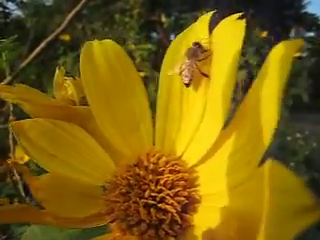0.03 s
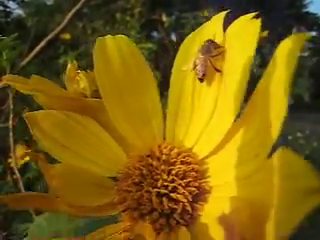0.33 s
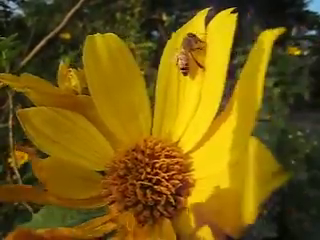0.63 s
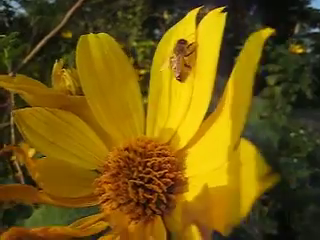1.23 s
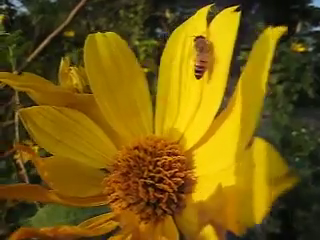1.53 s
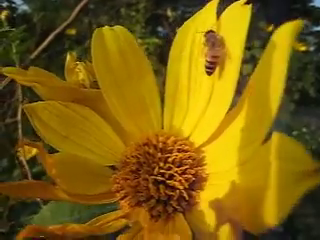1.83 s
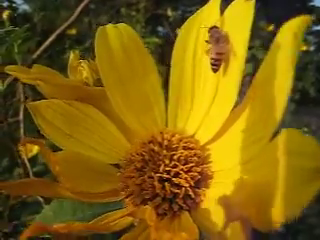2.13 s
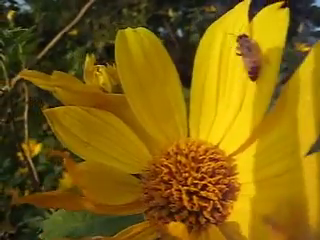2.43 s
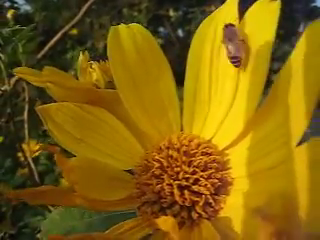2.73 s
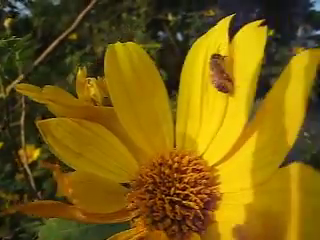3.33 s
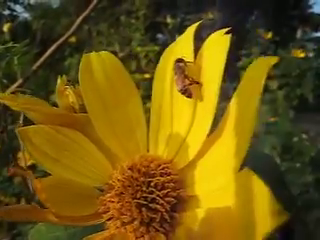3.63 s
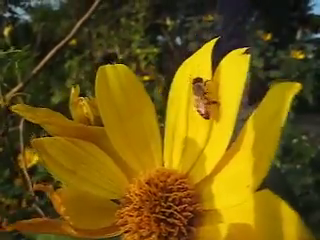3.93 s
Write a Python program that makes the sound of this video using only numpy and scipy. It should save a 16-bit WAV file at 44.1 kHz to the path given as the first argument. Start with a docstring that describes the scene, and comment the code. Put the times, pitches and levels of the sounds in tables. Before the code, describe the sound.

Quick, thin bird chirps come and go above a distant rumble and soft hiss.

```python
"""A garden, where small birds call in short bursts: quick falling chips, often followed by a
warbled cheep. Each call is a nearly pure tone modulated in frequency, which the ground, trees and
walls reflect. Under the birds lie a distant rumble and hiss, two deep drones, a brief far tone
and one dry tick, all filtered noise. Light air bumps the microphone now and then."""
import sys
import numpy as np
from scipy import signal
from scipy.fft import rfft, irfft
from scipy.io import wavfile
from scipy.ndimage import uniform_filter1d

SR = 44100
rng = np.random.default_rng(int(sys.argv[2]) if len(sys.argv) > 2 else 0)


def store_pcm(level_fs):
    """Save levels as 16-bit WAV."""
    pcm = np.round(np.clip(level_fs, -1, 1) * 32767).astype(np.int16)
    wavfile.write(sys.argv[1], SR, np.atleast_2d(pcm).T)


N = 176400
TIME = np.arange(N) / SR


def amp(db):
    """Amplitude grows tenfold with every 20 decibels."""
    return 10 ** (np.asarray(db) / 20)


def unit(x):
    """Normalisation: the signal is scaled to an rms of 1."""
    return x / np.sqrt(np.mean(x ** 2) + 1e-20)


def add(mix, start_s, sound):
    """Superposition: a sound adds to the mix from start_s on."""
    part = mix[max(round(start_s * SR), 0):][:len(sound)]
    part += sound[:len(part)]


def band_noise(centre_hz, width_hz):
    """Gaussian filtering leaves one band of noise; centred on zero it is a random wander."""
    hz = np.fft.rfftfreq(N, 1 / SR)
    band = np.exp(-.5 * ((hz - centre_hz) / width_hz) ** 2)
    return unit(irfft(rfft(rng.standard_normal(N)) * band, N))


def rumble_and_hiss():
    """Spectral shaping of noise gives a distant wash whose bass and mids swell separately."""
    # background spectrum: frequency_hz, relative_density_db
    spectrum = [(15, -19.5), (28, -12.5), (40, -0.5), (60, 4.5), (90, -8.5), (160, -10.5), (290, -14.5),
                (420, -21), (520, -20.5), (780, -23.5), (1450, -32.5), (2300, -37.5), (3500, -41),
                (5400, -45)]
    # swell of the bass: time_s, gain_db
    bass_swell = [(0, -.5), (.6, -.5), (.9, -6), (1.15, -3.5), (1.5, -1.5), (2.2, -1), (2.9, -1.5),
                  (3.3, 1), (3.7, -2), (4, -1)]
    # swell of the mids: time_s, gain_db
    mid_swell = [(0, 7.5), (.08, 1.5), (.75, -1.5), (1.4, 0.4), (2.2, 0.5), (3.05, 1), (3.3, 1.5),
                 (3.88, 1.5), (3.95, 6), (4, 9.5)]
    bass_top_hz, mid_hz, mid_width_octaves = 390, 1100, 0.84
    size, hop = 2048, 512
    t = np.arange(N // hop + 5) * hop / SR
    hz = np.fft.rfftfreq(size, 1 / SR) + 1
    real, imag, patches = rng.standard_normal((3, len(t), len(hz)))
    patches = uniform_filter1d(patches, size=8, axis=0)  # smooth in time, then in frequency
    patches_db = 0.78 * unit(uniform_filter1d(patches, size=14, axis=1))
    frequency_hz, density_db = np.transpose(spectrum)
    field_db = np.interp(np.log(hz), np.log(frequency_hz), density_db) + patches_db
    bass_band = 1 / (1 + (hz / bass_top_hz) ** 4)
    mid_band = np.exp(-.5 * (np.log2(hz / mid_hz) / mid_width_octaves) ** 2)
    field_db += np.outer(np.interp(t, *np.transpose(bass_swell)), bass_band)
    field_db += np.outer(np.interp(t, *np.transpose(mid_swell)), mid_band)
    frames = (real + 1j * imag) * amp(field_db)
    wash = signal.istft(frames.T, nperseg=size, noverlap=size - hop)[1][:N]
    return amp(-31.5) * unit(wash)


def drones():
    """Beating within narrow noise bands makes deep, wavering drones, as of a far engine."""
    # deep drones: pitch_hz, width_hz, level_db
    bands = [(40.4, 2.9, -36.5), (122.2, 10, -43.5)]
    return sum(amp(level_db) * band_noise(pitch_hz, width_hz) for pitch_hz, width_hz, level_db in bands)


def far_tone():
    """Exponential decay: a faint, far-off tone dies away in the first moments."""
    level_db, t60_s = -40.5, 0.39
    return amp(level_db - 60 * TIME / t60_s) * band_noise(centre_hz=864, width_hz=9.1)


def tick():
    """A heavily damped noise transient is heard as one dry tick, as of a twig."""
    start_s, decay_s, level_db = 2.928, .0011, -37
    age = TIME - start_s
    envelope = (age > 0) * np.exp(-abs(age) / decay_s)
    return amp(level_db) * envelope * band_noise(centre_hz=3900, width_hz=840)


def air_bumps():
    """Turbulence: each eddy at the microphone is one short, low swing of pressure."""
    # eddies: centre_s, pitch_hz, peak_db
    eddies = [(0.265, 68, -13.5), (0.487, 59.4, -16.5), (0.524, 65, -17), (.541, 128, -18.5),
              (0.565, 120, -15.5), (0.61, 90, -15.5), (0.797, 65, -17), (2.163, 65, -19),
              (2.501, 66, -20.5), (2.612, 91.6, -14), (3.154, 64, -20)]
    width_cycles = 0.31
    pressure = np.zeros(N)
    for centre_s, pitch_hz, peak_db in eddies:
        cycles = (TIME - centre_s) * pitch_hz
        envelope = np.exp(-.5 * (cycles / width_cycles) ** 2)
        pressure -= amp(peak_db) * envelope * np.cos(2 * np.pi * cycles)
    return pressure


def garden_echoes(direct):
    """Reflection and scattering: near echoes and a thin tail from the trees join the direct sound."""
    # reflections from the ground and nearby leaves: delay_s, gain_db
    reflections = [(.0043, -14.5), (.0115, -14), (.047, -20)]
    arrivals_per_s, build_s, t60_s, tail_db = 2000, 0.034, 0.72, -7.5
    t = TIME[:SR]
    tail = rng.standard_normal(SR) * (rng.random(SR) < arrivals_per_s / SR)
    tail *= (1 - np.exp(-t / build_s)) * amp(-60 * t / t60_s)
    response = amp(tail_db) * tail / np.linalg.norm(tail)
    for delay_s, gain_db in reflections:
        add(response, delay_s, amp([gain_db]))
    return direct + signal.fftconvolve(direct, response)[:N]


def whistle(pitch_hz, level_db, wander):
    """Random frequency and amplitude modulation make a soft-edged sine tone slightly unsteady."""
    edge_s, jitter_fraction, flutter_db = 0.0041, 0.024, 1
    t = np.arange(len(pitch_hz)) / SR
    drift, flutter = wander[:, :len(t)]
    ramp = np.clip(np.minimum(t, t[-1] - t) / edge_s, 0, 1)
    envelope = amp(level_db - flutter_db * flutter) * np.sin(np.pi / 2 * ramp)
    phase = 2 * np.pi * np.cumsum(pitch_hz * (1 + jitter_fraction * drift)) / SR
    return np.sqrt(2) * envelope * np.sin(phase)


def birds():
    """Frequency modulation shapes the calls: chips glide down, cheeps arch and warble."""
    # falling chips: start_s, length_s, start_hz, end_hz, level_db
    chips = [(0.171, 0.027, 2900, 2450, -52.5), (0.417, 0.017, 2980, 1940, -42),
             (.448, 0.016, 2440, 2020, -49.5), (0.589, 0.013, 3060, 2300, -49.5),
             (0.644, 0.021, 2580, 2410, -51), (0.668, 0.024, 2250, 1870, -45),
             (0.688, 0.0084, 1720, 1500, -45.5), (.697, 0.0075, 2630, 2550, -43.5),
             (0.702, 0.031, 2347, 2097, -43), (0.722, 0.0063, 1990, 1750, -39),
             (0.965, 0.0053, 2830, 2600, -31.5), (0.974, 0.013, 2420, 1895, -38),
             (1.504, 0.013, 2680, 2150, -43.5), (1.566, .014, 2580, 1980, -51.5),
             (1.993, .018, 2760, 1810, -46), (2.338, .026, 2284, 1933, -47.5),
             (2.393, 0.018, 2540, 1965, -48.5), (3.493, 0.0054, 2725, 2560, -30),
             (3.499, 0.0063, 2560, 2550, -33), (3.501, 0.0078, 2240, 2010, -36),
             (3.741, 0.0198, 2390, 1950, -36), (3.759, 0.014, 1750, 1630, -43),
             (3.771, 0.015, 2530, 2230, -36), (3.788, 0.01, 2150, 2120, -39),
             (3.803, 0.0081, 1744, 1690, -41), (3.808, 0.0073, 2420, 2260, -31.5),
             (3.813, 0.013, 2200, 2160, -32.5)]
    # warbled cheeps: start_s, length_s, start_hz, end_hz, arch_hz, level_db
    cheeps = [(0.202, .046, 3080, 2890, 122.5, -49.5), (0.241, 0.028, 2760, 2820, 2, -44.5),
              (0.524, 0.031, 2520, 2410, 9, -47), (0.732, 0.035, 2273, 2260, 18.5, -43),
              (.995, .022, 2810, 2892, 1, -34), (1.021, .022, 3070, 2633, -10.5, -37),
              (1.212, 0.036, 2533, 2380, -5, -49.5), (1.246, 0.025, 2510, 2464, 4, -44.5),
              (1.624, 0.023, 2274, 2270, 3, -52), (1.686, 0.024, 2160, 2080, 10, -52.5),
              (1.75, 0.071, 2330, 2236, 1, -50), (1.819, 0.024, 2296, 2210, 12.5, -46.5),
              (2.022, 0.042, 2600, 2335, 46, -43), (2.059, 0.038, 2498, 2478, -46.5, -40.5)]
    warble_rate_hz, warble_depth_hz = 103, 36
    calls = np.zeros(N)
    wander = np.array([band_noise(0, width_hz=340), band_noise(0, width_hz=130)])  # pitch, level
    for start_s, length_s, start_hz, end_hz, level_db in chips:
        pitch_hz = np.geomspace(start_hz, end_hz, round(length_s * SR))
        add(calls, start_s, whistle(pitch_hz, level_db, wander[:, round(start_s * SR):]))
    for start_s, length_s, start_hz, end_hz, arch_hz, level_db in cheeps:
        t = np.arange(0, length_s, 1 / SR)
        pitch_hz = np.linspace(start_hz, end_hz, len(t)) + arch_hz * np.sin(np.pi * t / length_s)
        pitch_hz += warble_depth_hz * np.sin(2 * np.pi * (warble_rate_hz * t + rng.random()))
        add(calls, start_s, whistle(pitch_hz, level_db, wander[:, round(start_s * SR):]))
    return calls


def scene():
    """Superposition: the birds, their echoes and the background sum to one channel."""
    mix = garden_echoes(birds()) + rumble_and_hiss() + drones() + far_tone() + air_bumps() + tick()
    return mix[None]


def record(dry):
    """Band limiting: a steep low-pass filter removes the high treble."""
    cutoff_hz = 5660
    lowpass = signal.firwin(151, cutoff_hz, window=("kaiser", 8), fs=SR)
    return signal.oaconvolve(dry, lowpass[None], "same")


dry = scene()
out = record(dry)
store_pcm(out)
```